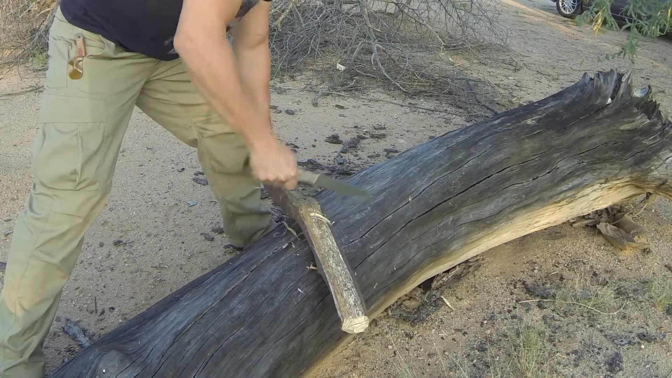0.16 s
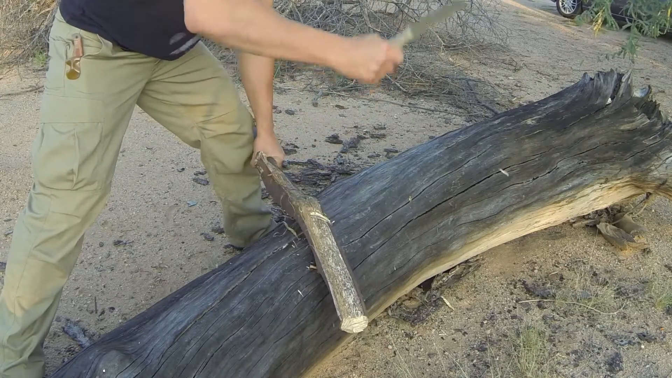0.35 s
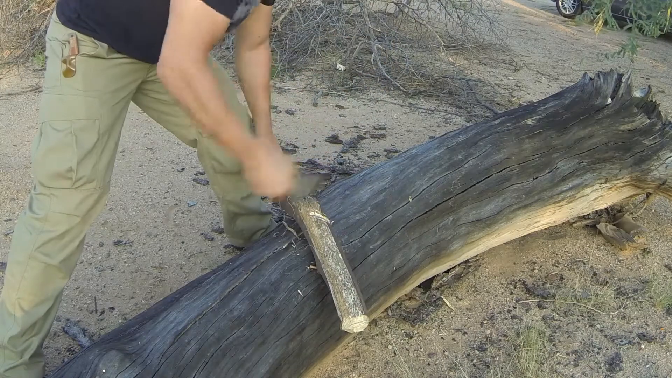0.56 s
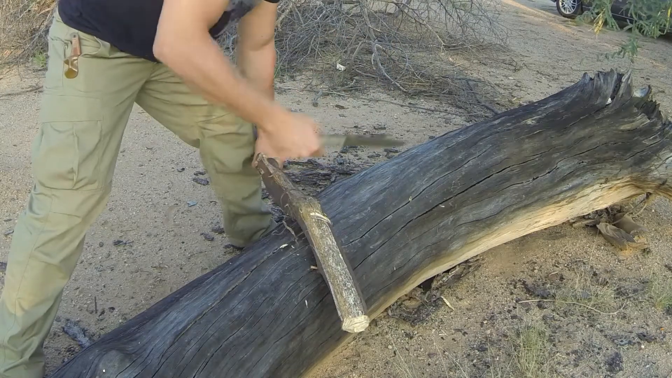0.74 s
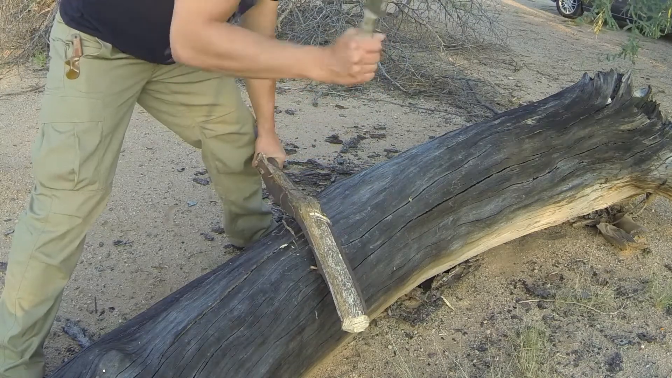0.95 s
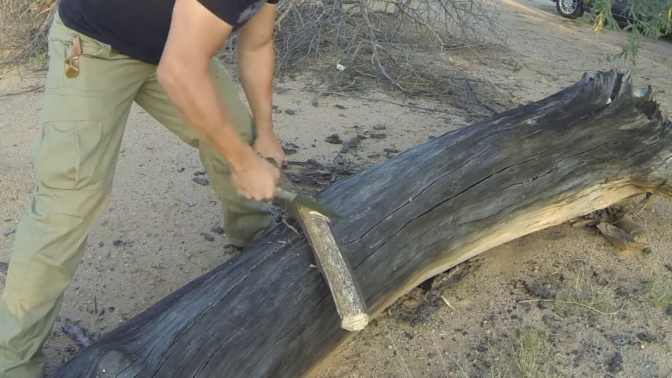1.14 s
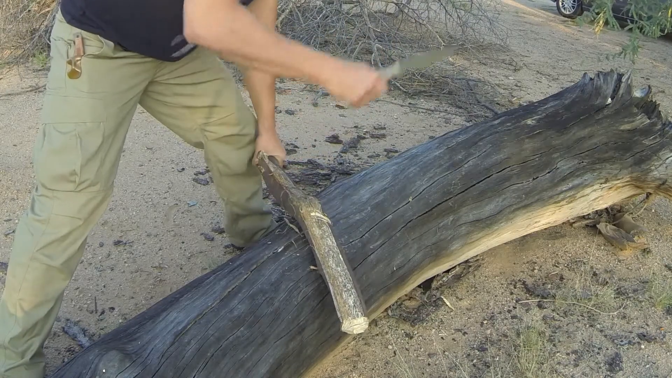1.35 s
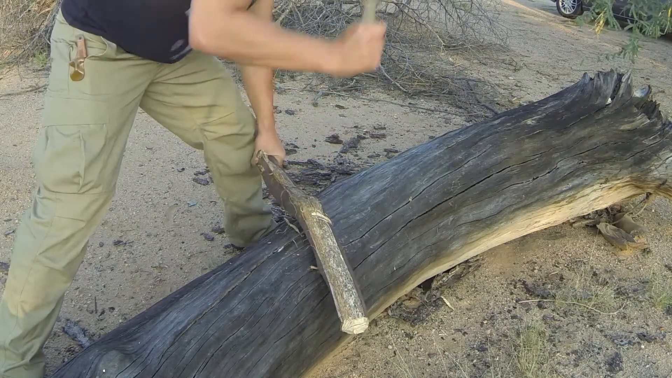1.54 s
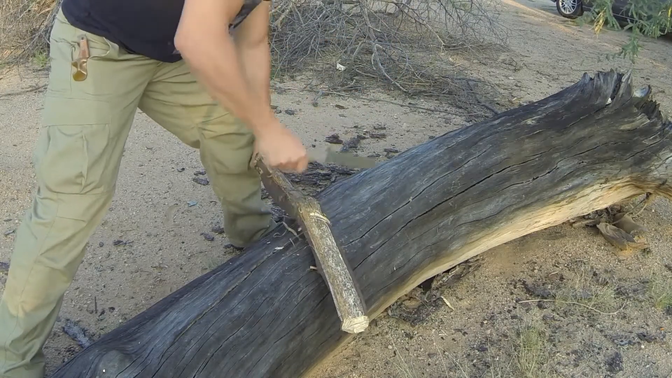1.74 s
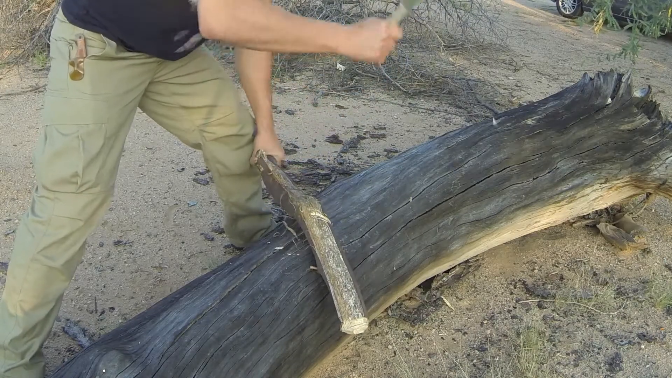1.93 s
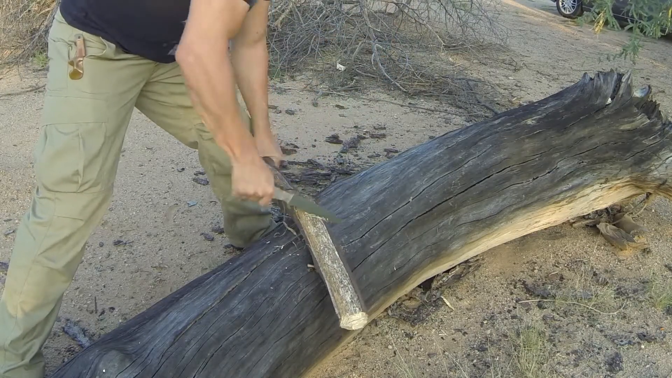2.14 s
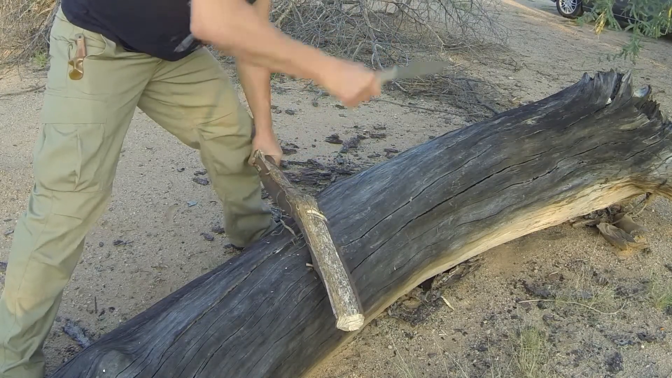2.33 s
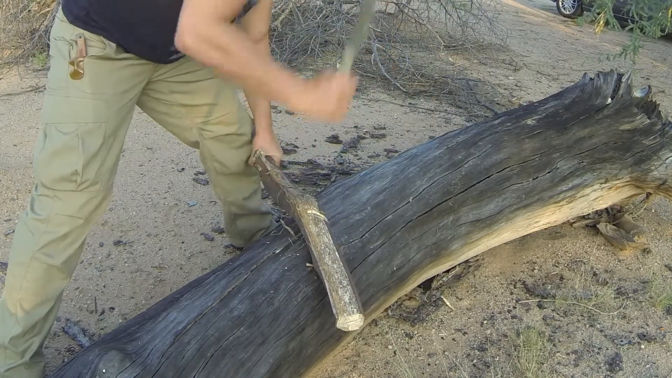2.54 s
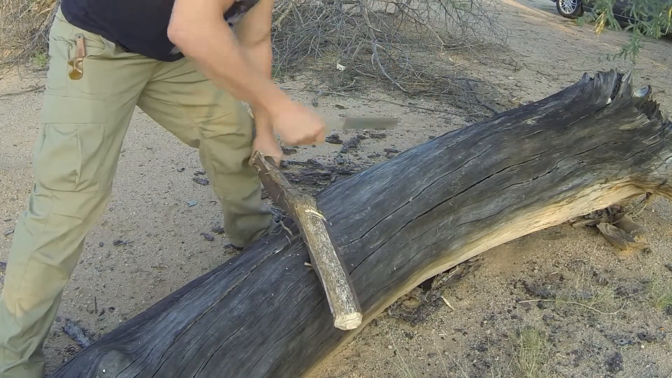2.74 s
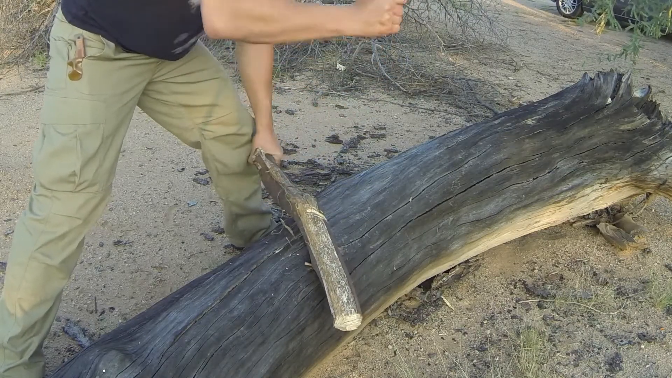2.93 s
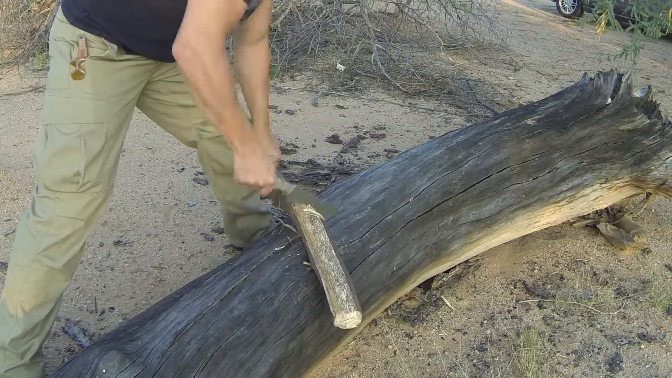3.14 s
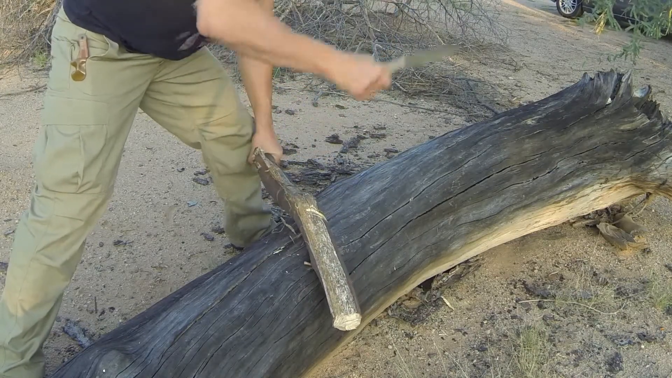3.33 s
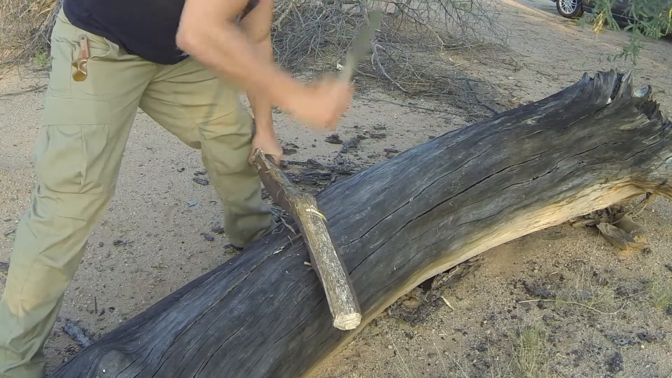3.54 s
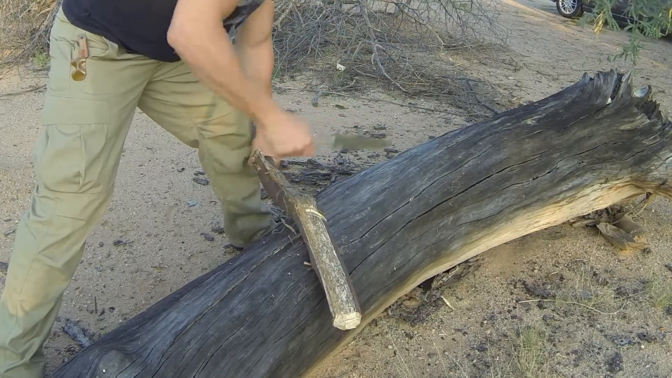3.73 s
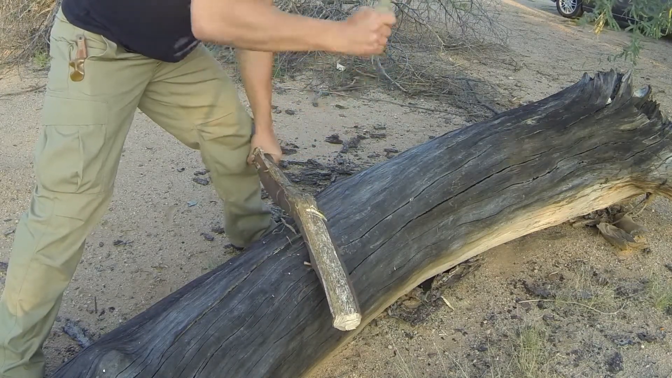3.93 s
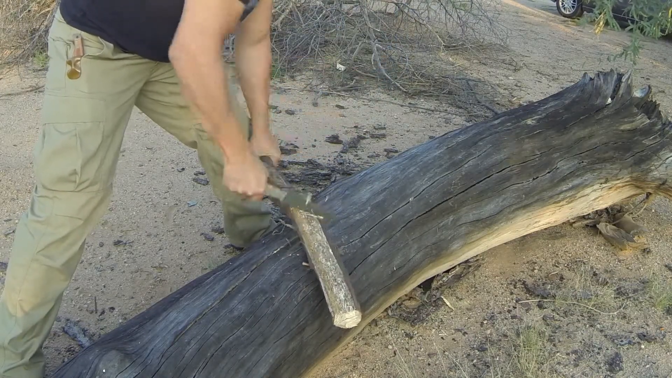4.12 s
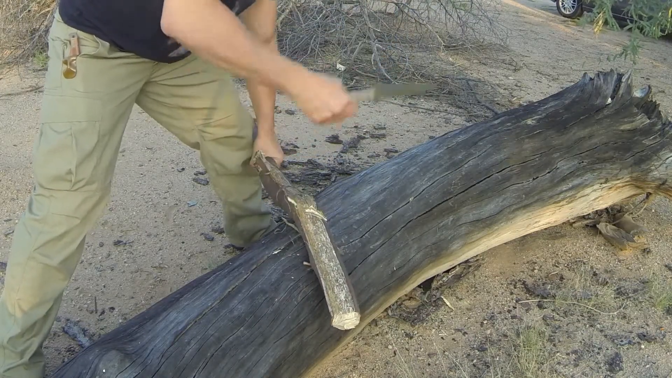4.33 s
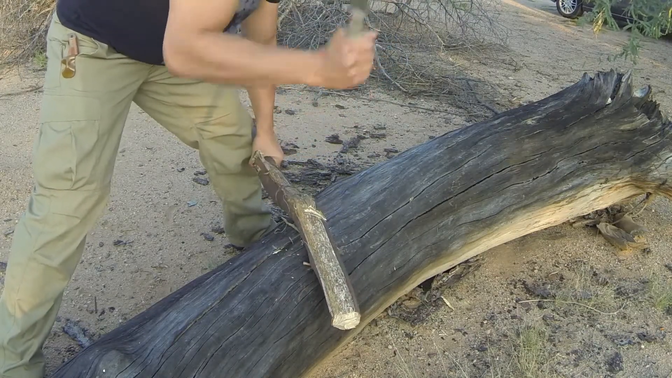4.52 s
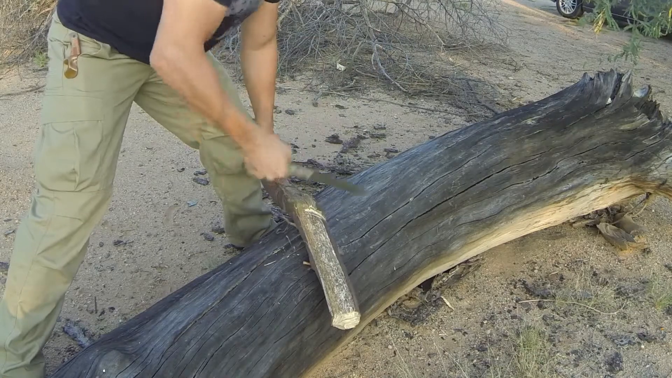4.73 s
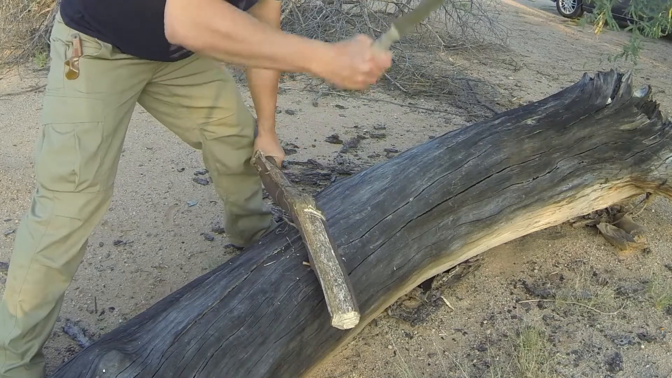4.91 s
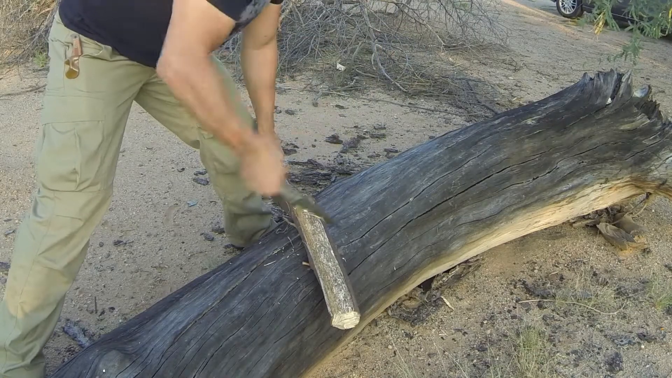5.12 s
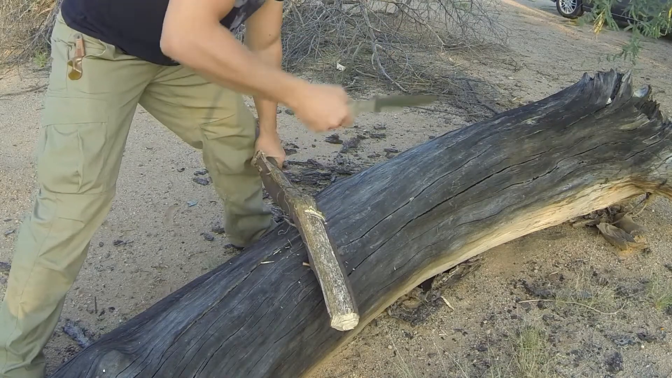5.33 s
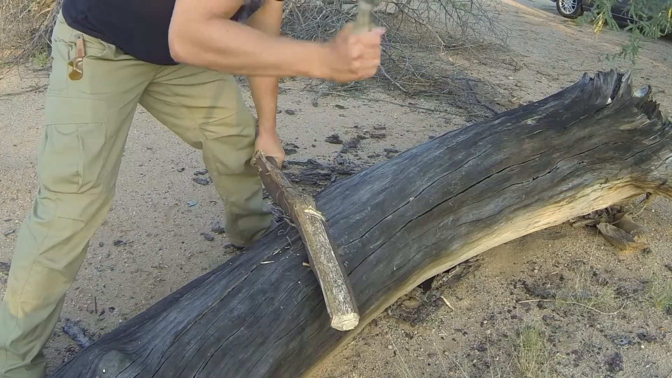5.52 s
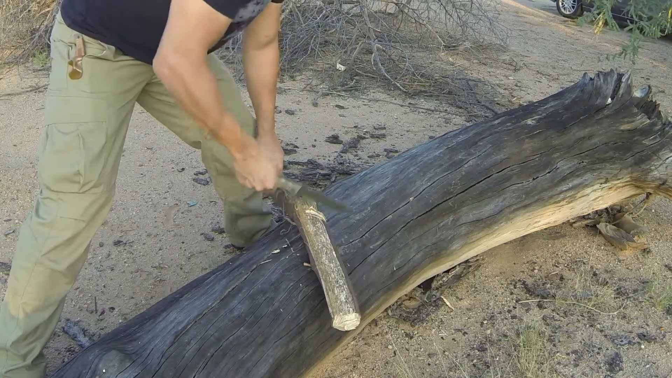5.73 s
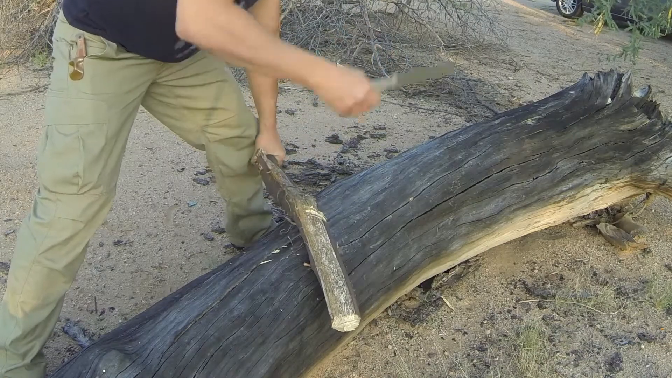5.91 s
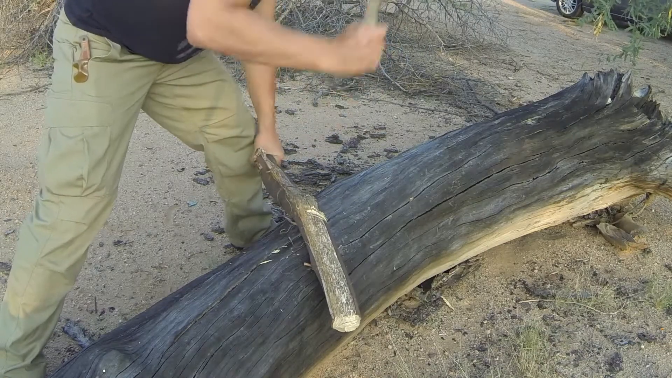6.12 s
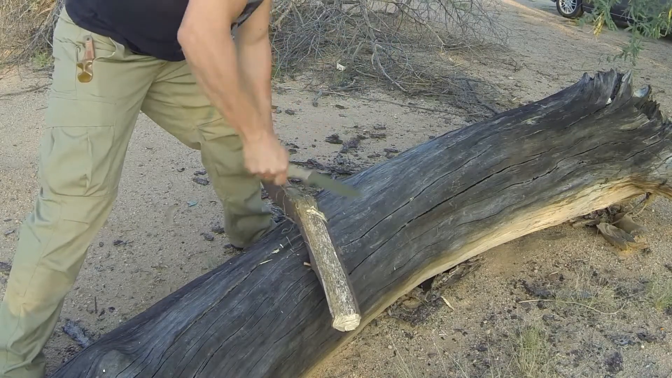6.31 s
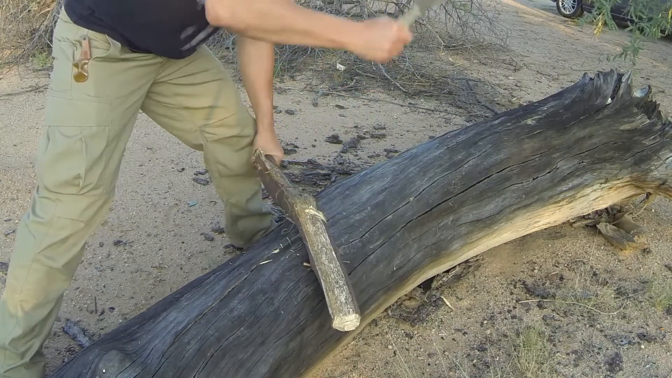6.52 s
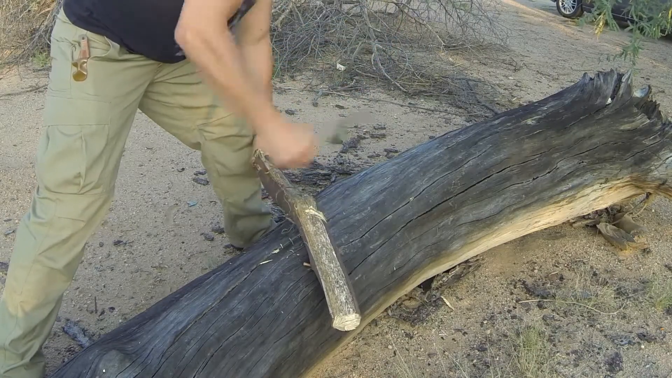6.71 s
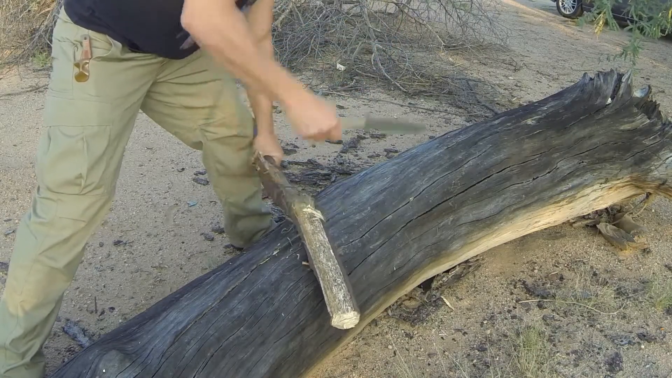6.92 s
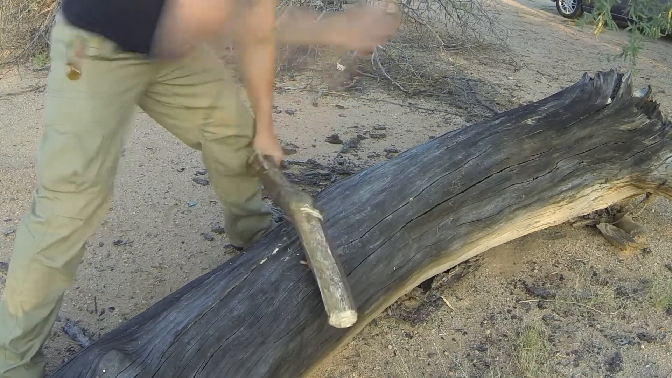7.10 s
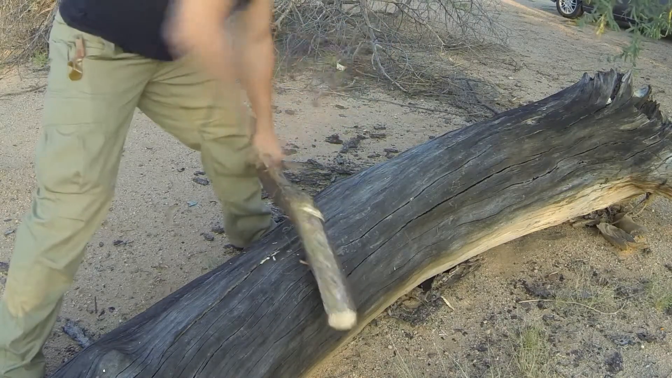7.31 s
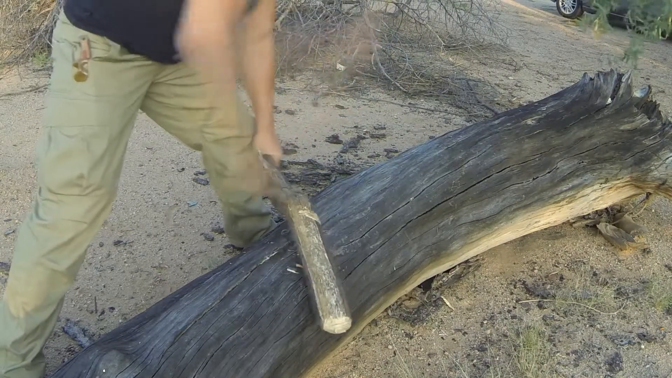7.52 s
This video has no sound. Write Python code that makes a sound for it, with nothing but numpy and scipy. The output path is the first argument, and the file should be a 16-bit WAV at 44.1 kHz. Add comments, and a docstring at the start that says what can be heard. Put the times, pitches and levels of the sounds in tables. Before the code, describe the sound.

Outdoors on dry sandy ground, a large knife hits a hard branch at a steady half-second pace. Every blow cracks short and bright, sometimes with a tiny metallic blade ring, followed by a low wooden bump, loose chips ticking and a faint slap of echo. Between blows there is quiet open air, distant road noise and a soft engine hum growing later. Close, clear pickup, with a sudden end.

```python
"""A heavy knife chops a dry branch lying across a log, fourteen times, outdoors: damped tones ring like wood.
Filtered noise makes the splitting fibres, rattling chips, scattered treble, brush and rough echoes of each chop.
The branch knocks back on the log as low thumps, chips tick, and the blade sings briefly as paired tones.
Behind it are noise for open air and far traffic, and two wavering tones for an engine's low hum.
The sound ends abruptly after seven seconds."""
import sys
import numpy as np
from scipy import signal
from scipy.io import wavfile
from scipy.ndimage import uniform_filter1d

SR = 44100
rng = np.random.default_rng(int(sys.argv[2]) if len(sys.argv) > 2 else 0)


def waveform_to_disk(signal):
    """Save audio, clipped to [-1, 1], as 16-bit WAV at the path in sys.argv[1]."""
    frames = np.transpose(np.atleast_2d(signal))
    scaled = np.clip(frames, -1, 1) * 32767
    samples = np.round(scaled).astype(np.int16)
    wavfile.write(sys.argv[1], SR, samples)


N = 333396  # length in samples

# In all tables and settings, t60 is the time in seconds that a sound takes to fade by 60 dB.


def amp(db):
    """Turns a level in dB into a gain."""
    return 10 ** (np.asarray(db) / 20)


def read(points, hz):
    """Reads a table of (Hz, value) at any frequency, with straight lines over log frequency."""
    table_hz, value = np.transpose(points)
    return np.interp(np.log(hz + 1), np.log(table_hz + 1), value)


def add(mix, start_s, sound):
    """Mixes a sound in at start_s seconds, cut off where the mix ends."""
    part = mix[max(round(start_s * SR), 0):][:len(sound)]
    part += sound[:len(part)]


def colour(x, points):
    """Filters a sound to a spectrum in dB, with no response ahead of the sound (minimum phase)."""
    hz = abs(np.fft.fftfreq(4096, 1 / SR))
    log_gain = np.log(amp(read(points, hz)))
    response = np.conj(np.exp(signal.hilbert(log_gain)))
    taps = np.fft.ifft(response).real[:2048]
    return signal.oaconvolve(x, taps)[:len(x)]


def hiss(points, patchy_db, size):
    """Noise of rms 1 whose spectrum drifts in patches over time and frequency."""
    frames = N * 4 // size + 5
    hz = np.fft.rfftfreq(size, 1 / SR)
    real, imaginary, patches = rng.standard_normal((3, len(hz), frames))
    patches = uniform_filter1d(uniform_filter1d(patches, size=9, axis=0), size=9, axis=1)
    level_db = read(points, hz)[:, None] + patchy_db * patches / patches.std()
    spectrum = (real + 1j * imaginary) * amp(level_db)
    x = signal.istft(spectrum, nperseg=size, noverlap=size * 3 // 4)[1][:N]
    return x / x.std()


# Colour of the open air. Each row: frequency in Hz, relative level in dB per Hz.
AIR_TONE = [(15, -15.5), (25, -6), (50, -5), (85, -12.5), (130, -7), (190, -17.5), (300, -20.5), (500, -25),
            (1500, -40.5), (2700, -39), (5000, -46.5), (5900, -49), (6800, -49), (8500, -49.5),
            (12400, -56), (14000, -66.5), (16000, -74.5)]


def open_air():
    """Open air is a steady, patchy noise, strongest in the bass."""
    return amp(-52) * hiss(AIR_TONE, patchy_db=3.5, size=2048)


# Colour of tyres on the far road. Each row: frequency in Hz, relative level in dB per Hz.
TYRE_TONE = [(350, -41.5), (550, -8.5), (950, -2.5), (1300, -11), (2500, -22), (6000, -28.5),
             (10000, -38.5), (13000, -64.5)]
# Swells of the traffic. Each row: time in seconds, level in dB.
TRAFFIC_LEVEL = [(0.0, -62), (1.06, -64.5), (1.25, -58.5), (1.61, -59), (1.8, -62), (2.84, -65.5),
                 (3.07, -64), (3.27, -58.5), (3.96, -65), (4.34, -59.5), (4.56, -60), (4.83, -65),
                 (5.06, -62), (5.38, -68.5), (5.93, -63.5), (6.38, -57.5), (6.8, -60.5)]


def far_traffic():
    """Tyres on a far road make a noise that swells and sinks."""
    level_db = np.interp(np.arange(N) / SR, *np.transpose(TRAFFIC_LEVEL))
    return amp(level_db) * hiss(TYRE_TONE, patchy_db=2.5, size=1024)


# Level of the hum. Each row: time in seconds, level in dB before a random waver.
HUM_LEVEL = [(0, -80), (2, -71.5), (2.4, -59.5), (2.9, -60), (3.4, -54), (3.9, -59.5), (4.5, -54.5),
             (5, -59.5), (5.5, -56.5), (6, -54.5), (6.5, -49), (7, -56)]


def engine_hum():
    """A far engine hums on two tones, its orders 4 and 3, that waver in pitch and level."""
    hum_hz = 151  # order 4, before it wavers
    waver = uniform_filter1d(uniform_filter1d(rng.standard_normal((2, N)), size=3000), size=3000)
    waver /= waver.std()
    cycles = np.cumsum(hum_hz + 1.3 * waver[0]) / SR
    level_db = np.interp(np.arange(N) / SR, *np.transpose(HUM_LEVEL)) + 1.5 * waver[1]
    order_4 = np.sin(2 * np.pi * cycles)
    order_3 = amp(-6.0) * np.sin(2 * np.pi * 0.75 * cycles)
    return np.sqrt(2) * amp(level_db) * (order_4 + order_3)


# Frequencies in Hz of the nine parts of a blow: three for weight, two for crack, one for ring, three for split.
PART_HZ = (200, 470, 740, 1300, 1900, 2400, 3600, 5400, 8300)
# What every blow gives each of these parts, in dB, before its own levels are added.
PART_BASE_DB = (-10.5, -1.83, 0.16, 1.8, -1.45, 0.48, 1.5, 2.5, -5.5)


def stirred(weight_db, crack_db, ring_db, split_db, brightness):
    """One blow stirs each part differently; brightness tilts the split in dB per octave."""
    split = split_db + brightness * np.log2(np.divide(PART_HZ[-3:], PART_HZ[-2]))
    return np.add(PART_BASE_DB, [weight_db] * 3 + [crack_db] * 2 + [ring_db, *split])


# Ringing tones of the branch on the log, before each blow shifts them.
# Each row: frequency in Hz, relative level in dB, t60 in seconds before the ring factor.
WOOD_MODES = [(91.5, -14, 0.44), (131, -11, 0.17), (212, 14, 0.031), (270, -8, 0.031), (296.5, 6, 0.034),
              (396.5, -1, .07), (462.5, 0.5, 0.059), (691.4, 1, 0.068), (748.4, 2.5, 0.031),
              (806, -2.5, .055), (1079, 3.5, .055), (1389, 0, 0.068), (1486.6, 9, 0.034),
              (1430, -15.5, 0.01), (1790, -27.5, 0.0039), (1838, 11, 0.036), (1990, -2.5, 0.016),
              (2283, -12.5, 0.026), (2390, 11.5, 0.032), (2310, -14, 0.004), (2700, 6.5, 0.01),
              (3430, -10.5, 0.017), (4060, 2, 0.0067), (4505, -11, 0.013), (5380, -2.5, 0.012)]
# Colour of splitting fibres. Each row: frequency in Hz, gain in dB.
SPLIT_TONE = [(2000, -16), (3000, 7.5), (5500, -5.5), (8500, 5), (9800, -9.5), (12500, -20), (13500, -29.5),
              (16000, -48)]


def chop(parts_db, bite_ms):
    """The edge splits fibres as it bites; the full blow follows and rings the wood."""
    ring = 0.97  # factor on every t60 of the wood
    t = np.arange(SR // 6) / SR
    parts = list(zip(PART_HZ, parts_db))
    hz, db, t60 = np.transpose(WOOD_MODES)[:, :, None]
    # the branch never lies twice the same way
    level_shift_db = 2 * rng.standard_normal((len(hz), 1))
    pitch_shift = .006 * rng.standard_normal((len(hz), 1))  # as a share of the pitch
    since = np.maximum(t - bite_ms / 1000, 0)  # seconds since the full blow
    rise = (1 - np.exp(-since / .0001)) ** 2
    fade = amp(db + read(parts, hz) + level_shift_db - 60 * since / (ring * t60))
    tones = fade * np.cos(2 * np.pi * hz * (1 + pitch_shift) * since)
    wood = rise * tones.sum(0)
    burst = (1 - np.exp(-t / 0.0016)) * (amp(-60 * t / 0.016) + amp(-20 - 60 * t / 0.0069))
    split = colour(burst * rng.standard_normal(len(t)), SPLIT_TONE)
    split = colour(split, parts[-3:])
    # the branch is too small for deep bass
    return colour(amp(-2.5) * wood + amp(9.5) * split, [(20, -45), (80, -1.0)])


# Dulling of the near reflection. Each row: frequency in Hz, gain in dB.
REFLECTION_TONE = [(2600, 0), (3300, -12)]


def near_reflection(parts_db, bite_ms, db):
    """A near reflection is a duller, weaker repeat of the chop, with its own random details."""
    return amp(db) * colour(chop(parts_db, bite_ms), REFLECTION_TONE)


def ping(db, hz, t60):
    """A small stiff object rings as a short damped pair of close tones that beat."""
    t = np.arange(SR // 15) / SR
    second_hz = hz * rng.uniform(1.03, 1.07)
    tones = np.sin(2 * np.pi * hz * t) + 0.33 * np.sin(2 * np.pi * second_hz * t)
    return amp(db - 60 * t / t60) * (1 - np.exp(-t / 0.00044)) * tones


def blade_song(db, hz):
    """The blade sings briefly, because the wood grips it and damps it at once."""
    blade = np.zeros(SR // 6)
    add(blade, 0, ping(db, hz, t60=.009))
    return blade


# Fading of bark and chips before the extra settling. Each row: frequency in Hz, t60 in seconds.
CHATTER_FADE = [(100, .4), (300, 0.98), (1000, 1), (3000, 0.2), (8000, 0.1), (14000, .12)]
# Colour of the rattle before the blow adds its own. Each row: frequency in Hz, gain in dB.
CHATTER_TONE = [(50, -43.5), (100, -7), (300, -8), (1000, -19), (2600, -16), (3500, -25.5), (8000, -30.5),
                (10000, -30), (14000, -42)]


def chatter(parts_db):
    """Bark and chips rattle as the branch shakes: uneven bursts, each band dying at its own speed."""
    rattle_db = -3.5
    hz, t, z = signal.stft(rng.standard_normal(SR // 2), SR, nperseg=256)
    bursts = uniform_filter1d(rng.standard_normal(z.shape), size=25, axis=0)
    bursts_db = 4.5 * uniform_filter1d(bursts / bursts.std(), size=2, axis=1)
    tone_db = read(CHATTER_TONE, hz) + 0.65 * read(list(zip(PART_HZ, parts_db)), hz)
    fade_db = -60 * t / read(CHATTER_FADE, hz)[:, None]
    settling_db = -7.0 * (t / 0.057) ** 2  # the branch settles
    level_db = rattle_db + tone_db[:, None] + fade_db + settling_db + bursts_db
    x = signal.istft(z * amp(level_db), SR, nperseg=256)[1]
    return x * (1 - np.exp(-np.arange(len(x)) / SR / 0.0055))


def uneven_noise(swing_db, fade_s, linear_db, late_db, rise_s):
    """Noise with a soft start and uneven level; by fade_s it has sunk by linear_db plus late_db."""
    t = np.arange(SR // 5) / SR
    noise, clumps = rng.standard_normal((2, len(t)))
    clumps = uniform_filter1d(clumps, size=250)
    fade_db = -linear_db * t / fade_s - late_db * (t / fade_s) ** 4
    level_db = swing_db * clumps / clumps.std() + fade_db
    return noise * amp(level_db) * (1 - np.exp(-t / rise_s))


# Colour of the bright tail. Each row: frequency in Hz, gain in dB.
TAIL_TONE = [(2000, -19), (3800, -1.5), (6000, -4.5), (8500, -5), (11000, -10.5), (13500, -18.5),
             (16000, -44)]


def bright_tail(split_db):
    """A short, uneven bright hiss trails each chop, like its treble scattered by the surroundings."""
    noise = uneven_noise(swing_db=3.5, fade_s=.13, linear_db=9.0, late_db=8.0, rise_s=.008)
    return colour(amp(-53.0 + 0.25 * split_db) * noise, TAIL_TONE)


# Colour of the dry brush. Each row: frequency in Hz, gain in dB.
BRUSH_TONE = [(2000, -24.5), (3800, -3), (6000, -2), (8500, -0.5), (11000, -2.5), (13500, -5.5),
              (16000, -29.5)]


def brush(sound):
    """Twigs all round scatter the treble of a chop into an uneven hiss of its own colour."""
    taps = uneven_noise(swing_db=3.0, fade_s=0.11, linear_db=12.0, late_db=8.0, rise_s=.006)
    taps = amp(-23) * taps / np.linalg.norm(taps)
    return signal.fftconvolve(sound, colour(taps, BRUSH_TONE))


# Distant walls. Each row: seconds after the far echo's delay (minus is earlier), dB added to its level.
WALLS = [(-.128, -4.5), (-.106, -14.5), (0, -6.5), (0.036, -19)]
# Colour of the walls alone. Each row: frequency in Hz, gain in dB.
WALL_TONE = [(250, 5.5), (500, 3), (850, -1.5), (1300, 2.5), (2400, 0), (4500, 1), (7000, -11)]
# Colour of all that this function returns. Each row: frequency in Hz, gain in dB.
ECHO_TONE = [(100, -24), (300, -2.5), (600, 0.5), (1400, -6), (2500, -1), (3500, -3.5), (4600, -1),
             (6000, -16), (9000, -13), (14000, -14)]


def surroundings(sound, far_s, far_db):
    """Log, sand and legs scatter at once, rough walls at a distance, the far yard long and faintly."""
    near_db, near_t60 = -16, 0.061
    yard_db, yard_t60 = -43, .9
    t = np.arange(SR) / SR
    taps = np.zeros(SR)
    # one random click, up or down, in every 20 samples
    places = np.arange(0, SR, 20) + rng.integers(0, 20, SR // 20)
    taps[places] = rng.choice([-1., 1.], SR // 20)
    near = taps * amp(-60 * t / near_t60) * (t > .003)
    yard = taps * amp(-60 * t / yard_t60 - 70 * np.exp(-t / 0.17))  # held back at first
    space = amp(yard_db) * yard / np.linalg.norm(yard) + amp(near_db) * near / np.linalg.norm(near)
    for lag_s, db in WALLS:
        # a rough wall smears its echo; its flat face returns one clear tap
        rough = rng.standard_normal(SR // 25) * amp(-60 * t[:SR // 25] / 0.071)
        rough[0] = 1.2
        echo = amp(far_db + db) * rough / np.linalg.norm(rough)
        add(space, far_s + lag_s, colour(echo, WALL_TONE))
    return signal.fftconvolve(sound, colour(space, ECHO_TONE))


# The blows. Each row: start in seconds, then what the blow adds in dB to low weight, crack, sharp ring and
# splitting fibres, brightness of the split in dB per octave, time to bite in ms, song of the blade in dB,
# its pitch in Hz, delay of the far echo in seconds, its base level in dB before walls and colour,
# near reflection in dB before dulling.
CHOPS = [(0.0505, -12.5, -15, -20, -18.5, -0.5, 0.47, -29, 3470, 0.18, -25, -22),
         (0.6012, -10.5, -14, -12.5, -17, 1, 0.62, -14, 4040, 0.18, -28, -12.5),
         (1.12, -10, -18.5, -24.5, -11, 1, 0.3, -10, 3897, 0.17, -28.5, -22.5),
         (1.6537, -11, -16.5, -18.5, -14, -7, 0.9, -23, 3670, 0.16, -26.5, -26),
         (2.1493, -11, -16, -14.5, -19, -5, 0.83, -18.5, 4240, 0.17, -28.5, -23),
         (2.6196, -12, -18.5, -19.5, -14, 4.5, 0.74, -23.5, 5460, 0.17, -26.5, -25.5),
         (3.1164, -9, -18.5, -14.5, -17.5, -0.5, 0.64, -23.5, 5720, 0.17, -25, -25),
         (3.6138, -10.5, -14.5, -12, -22.5, 4.5, 0.62, -26, 4590, 0.17, -25.5, -24),
         (4.1144, -12, -17.5, -15, -15.5, 1, 1.33, -14, 3910, 0.17, -25, -24.5),
         (4.6639, -11.5, -18, -15, -21.5, 5.5, 0.8, -17, 4480, .165, -26, -26.5),
         (5.1569, -13.5, -17.5, -16, -18.5, -4.5, 0.83, -19.5, 4460, .175, -27, -22),
         (5.6722, -14, -15.5, -10.5, -14, 4.5, 1.1, -8, 5295, 0.18, -29, -22),
         (6.2528, -7, -17, -17.5, -16, -2.5, 0.9, -17, 3500, 0.17, -25.5, -22.5),
         (6.7621, -12, -15, -20, -13.5, -4, 0.77, -28, 4400, .18, -27, -27.5)]


def chopping(mix):
    """Each blow sounds with its blade, rattles bark and chips, and returns from near and far."""
    for start_s, *blow, bite_ms, blade_db, blade_hz, far_s, far_db, reflection_db in CHOPS:
        parts_db = stirred(*blow)
        wood = chop(parts_db, bite_ms)
        add(wood, .0135, near_reflection(parts_db, bite_ms, reflection_db))  # 13.5 ms later
        blade = blade_song(blade_db, blade_hz)
        add(mix, start_s, wood + blade)
        add(mix, start_s, chatter(parts_db))
        add(mix, start_s, bright_tail(parts_db[-2]))
        add(mix, start_s, brush(wood + blade))
        # the flat of the blade faces the walls, so its song is stronger there
        add(mix, start_s, surroundings(wood + amp(3.0) * blade, far_s, far_db))


def knock(db):
    """Wood on wood: a dull thump, a deeper shudder of the log and a tick of bark on bark."""
    hz = 180
    t = np.arange(SR // 8) / SR
    thump = -np.sin(2 * np.pi * hz * t) * (1 - np.exp(-t / .002)) * amp(-60 * t / .034)
    shudder = -np.sin(2 * np.pi * 0.66 * hz * t) * (1 - np.exp(-t / 0.0028)) * amp(-60 * t / 0.06)
    tick = rng.standard_normal(len(t)) * amp(-60 * t / .03)
    tick = colour(tick, [(300, -12), (2500, -6.5), (8000, -29.0), (12000, -41.5)])
    return amp(db) * (amp(12.0) * thump + amp(0.5) * shudder + amp(-15.5) * tick)


# The branch drops back on the log. Each row: start in seconds, relative level in dB, seconds to the rebound.
KNOCKS = [(0.113, -41, .026), (0.64, -35, .037), (1.152, -33, .02), (1.188, -33.5, .021),
          (1.687, -33, .023), (2.209, -32.5, 0.025), (2.649, -35, 0.044), (2.665, -35, 0.031),
          (3.164, -29, 0.022), (3.651, -35.5, 0.029), (4.155, -26, 0.032), (4.69, -38, 0.052),
          (4.716, -36, .027), (5.189, -33, .026), (5.707, -35, .044), (5.724, -35, .027),
          (6.28, -35.5, .082), (6.303, -28.5, 0.021), (6.79, -40, .056), (6.814, -28.5, 0.032)]


def knocking(mix):
    """The branch lands on the log and each landing rebounds once, weaker."""
    for start_s, db, hop_s in KNOCKS:
        add(mix, start_s, knock(db))
        add(mix, start_s + hop_s, knock(db - 6.5))


def chip(db, hz):
    """A dry tick: a ping in a puff of bright noise."""
    t = np.arange(SR // 15) / SR
    puff = rng.standard_normal(len(t)) * amp(-60 * t / 0.02)
    puff = colour(puff, [(2000, -32), (4000, -1), (9000, 3), (13000, -25.5)])
    return ping(db, hz, t60=0.016) + amp(db + 0.5) * puff


# Chips that snap off or land. Each row: start in seconds, relative level in dB, pitch in Hz.
CHIPS = [(0.7916, -51, 7940), (2.6424, -50, 6650), (2.6604, -65, 8300), (4.138, -53, 6680),
         (4.6754, -37, 5420), (5.354, -63, 8200)]


def ticking_chips(mix):
    """Small chips make bright ticks as they snap off or land."""
    for start_s, db, hz in CHIPS:
        add(mix, start_s, chip(db, hz))


# Colour of one passing car's tyres. Each row: frequency in Hz, relative level in dB per Hz.
PASS_TONE = [(600, -31), (850, -5.5), (940, -15.5), (1030, 4), (1150, -9.5), (1500, -38.5)]


def passing_car():
    """The tyres of one passing car sing: a narrow rush that swells and fades."""
    middle_s, half_length_s = 1.52, .16  # 6 dB down half a length from the middle
    t = np.arange(N) / SR
    level_db = -54 - 6.0 * ((t - middle_s) / half_length_s) ** 2
    return amp(level_db) * hiss(PASS_TONE, patchy_db=2, size=2048)


def scene():
    """Background, chops with their rattle and echoes, knocks and chips."""
    mix = open_air() + far_traffic() + engine_hum() + passing_car()
    chopping(mix)
    knocking(mix)
    ticking_chips(mix)
    return mix[None]


# Treble of the microphone. Each row: frequency in Hz, gain in dB.
MICROPHONE_TONE = [(9000, -0.5), (12500, -2), (13500, -8), (16000, -7)]


def record(dry):
    """The microphone dulls the top, peaks round off at full scale, the sound stops, then treble is cut."""
    end_s, edge_hz = 7.008, 16200
    heard = colour(dry[0], MICROPHONE_TONE)[None]
    soft = heard / (1 + abs(heard) ** 8) ** .125
    kept = soft * (np.arange(N) < end_s * SR)
    low_pass = signal.firwin(511, edge_hz, window=("kaiser", 9), fs=SR)
    return signal.oaconvolve(kept, low_pass[None], "same")


dry = scene()
out = record(dry)
waveform_to_disk(out)
```